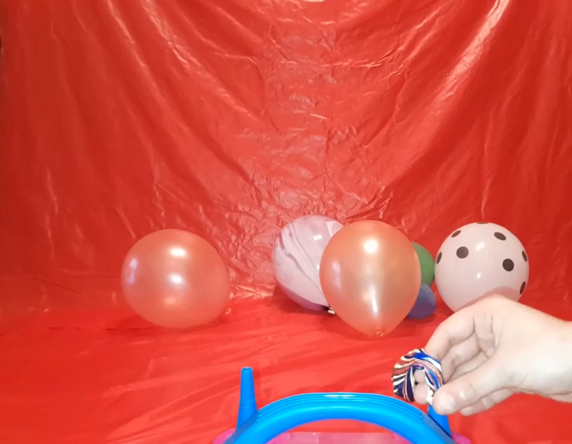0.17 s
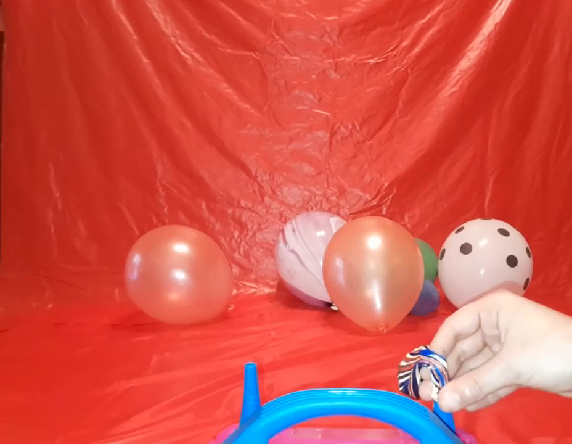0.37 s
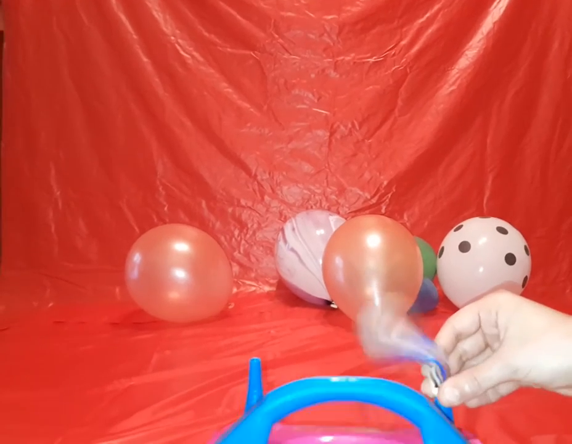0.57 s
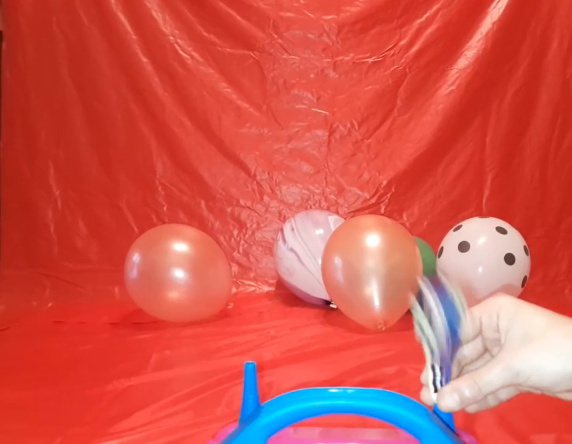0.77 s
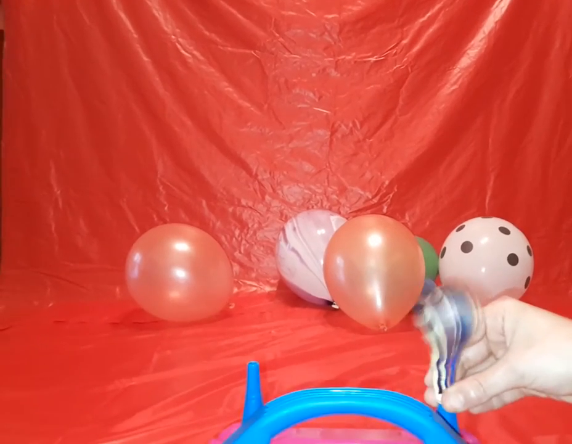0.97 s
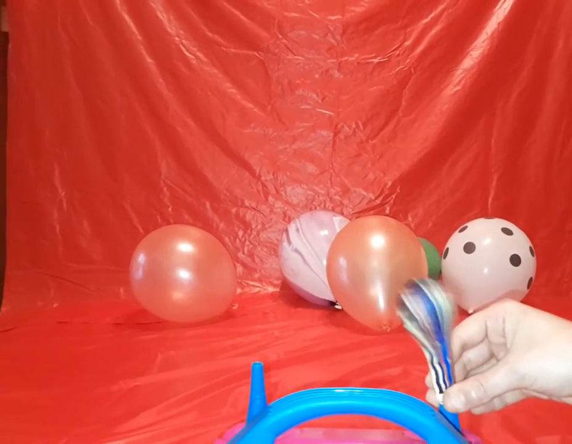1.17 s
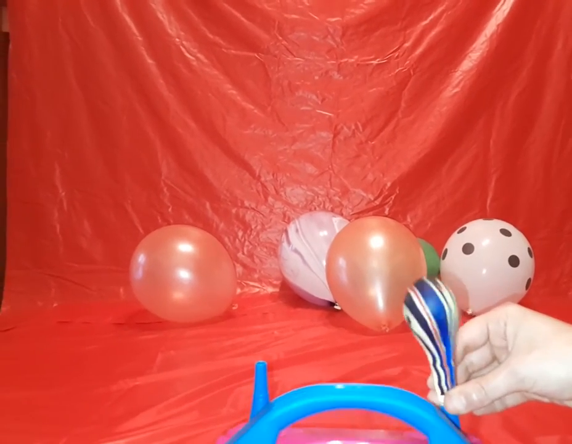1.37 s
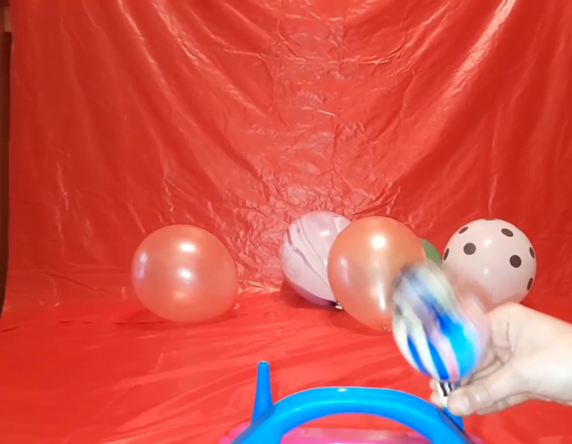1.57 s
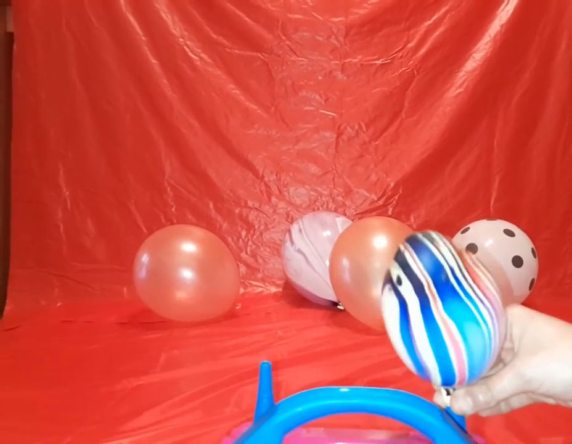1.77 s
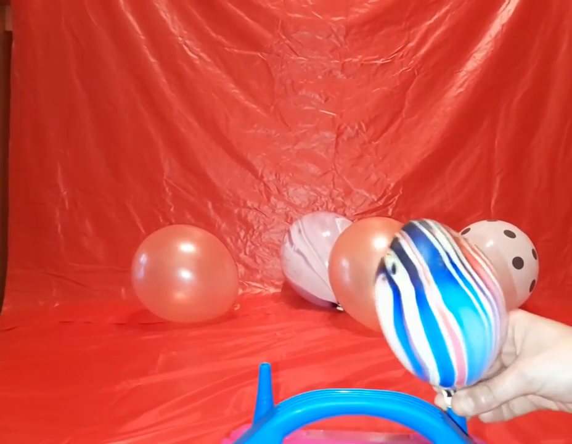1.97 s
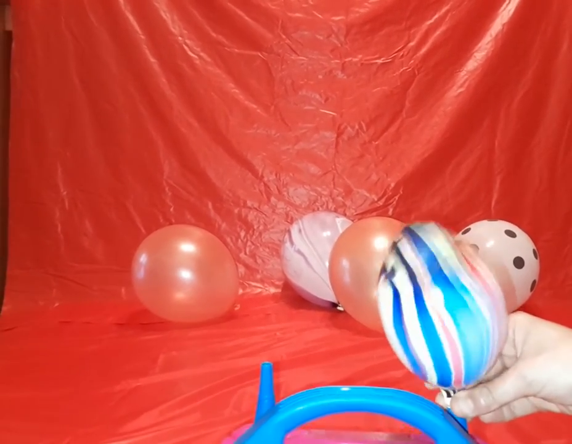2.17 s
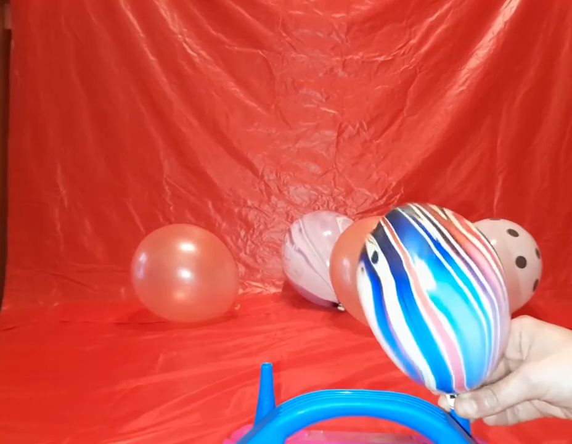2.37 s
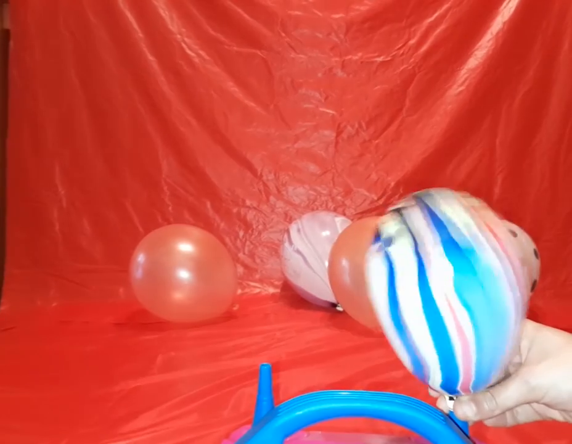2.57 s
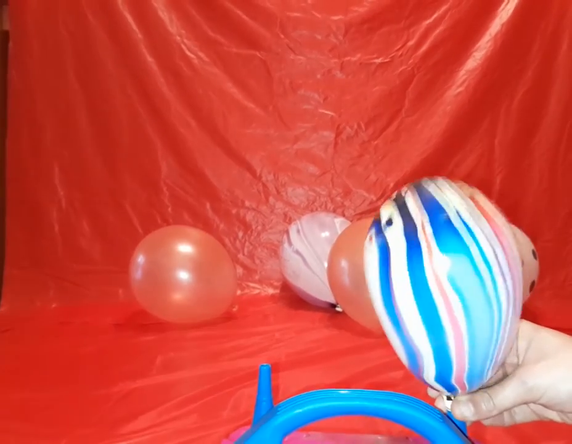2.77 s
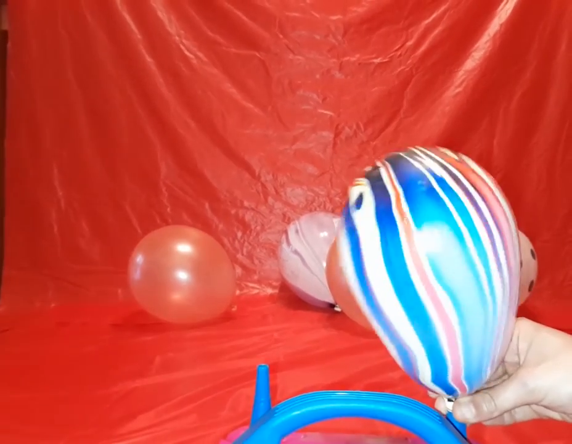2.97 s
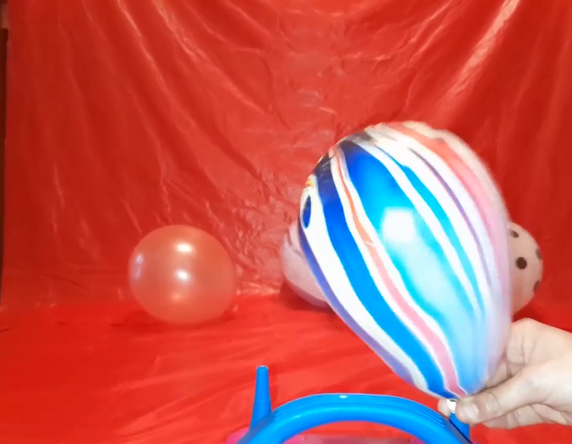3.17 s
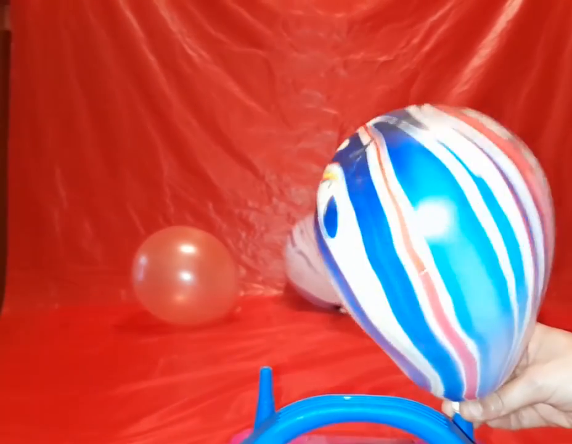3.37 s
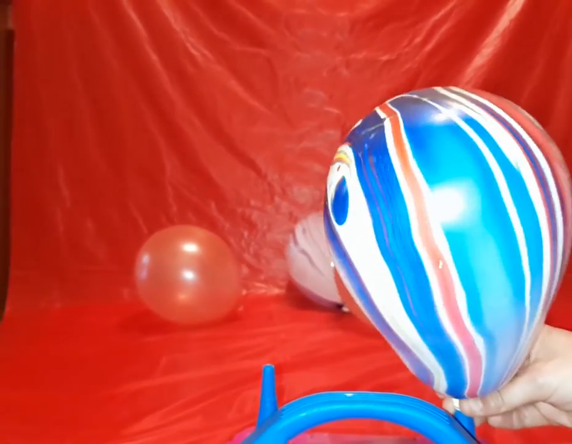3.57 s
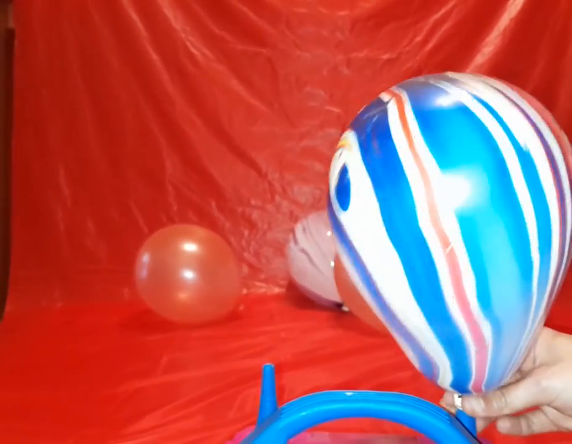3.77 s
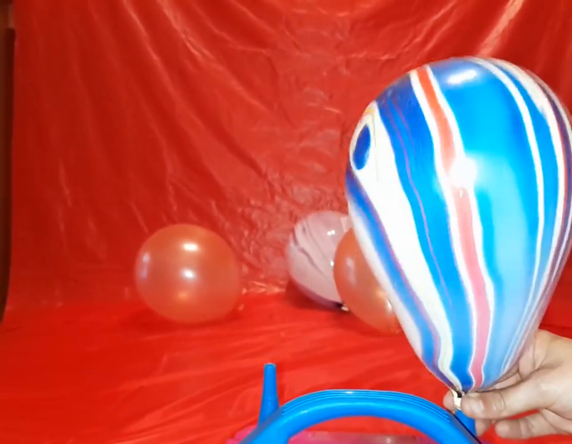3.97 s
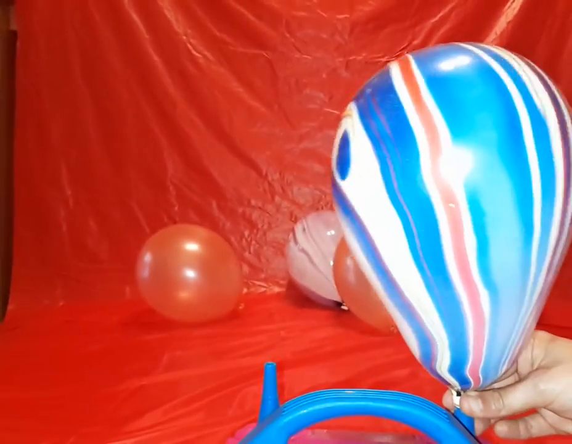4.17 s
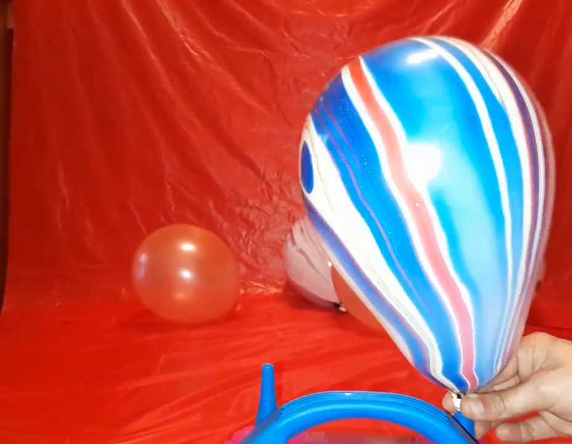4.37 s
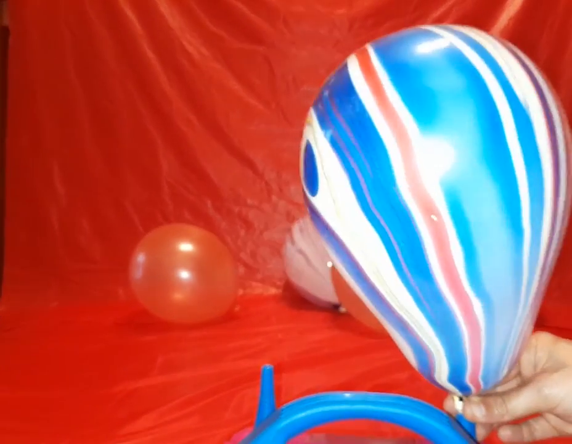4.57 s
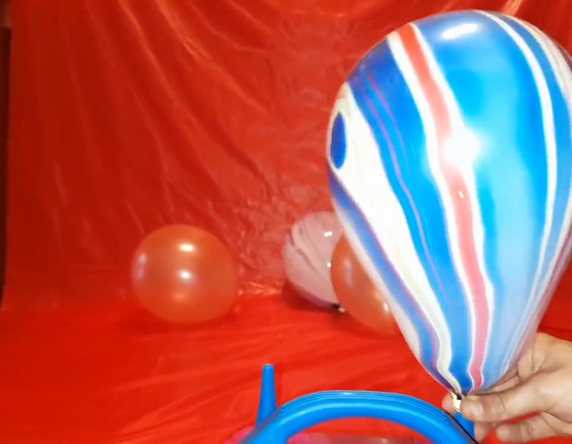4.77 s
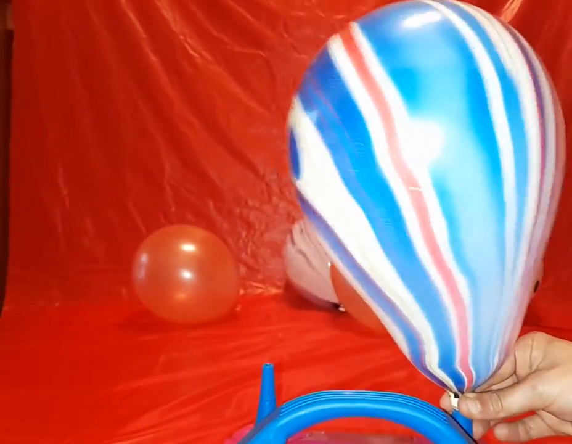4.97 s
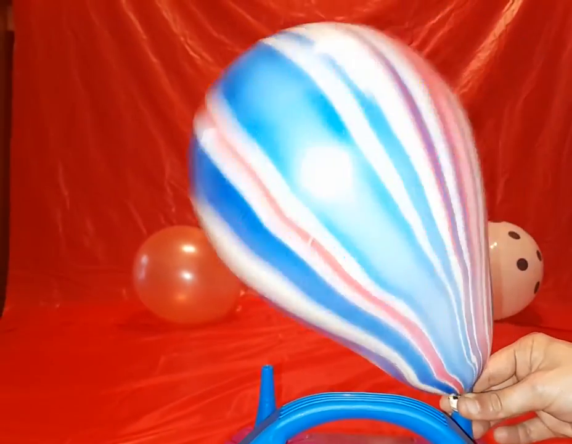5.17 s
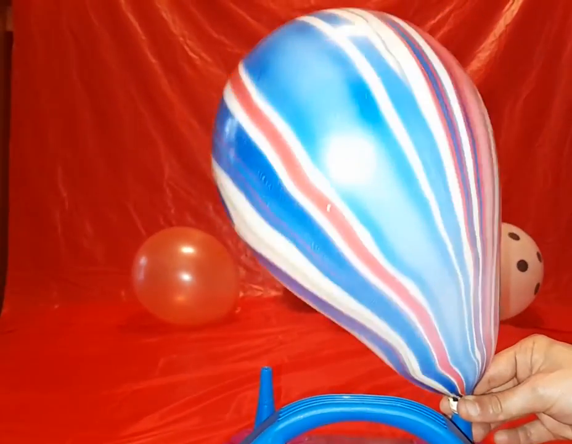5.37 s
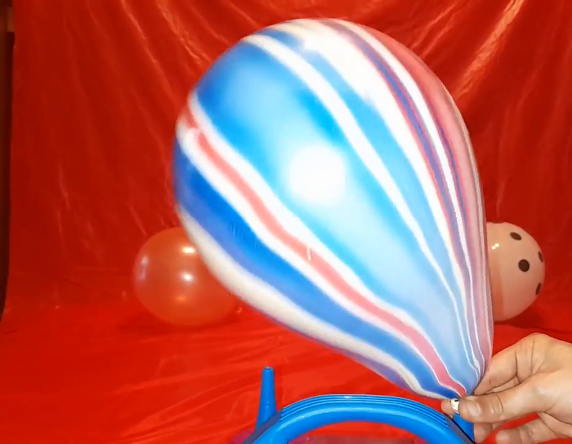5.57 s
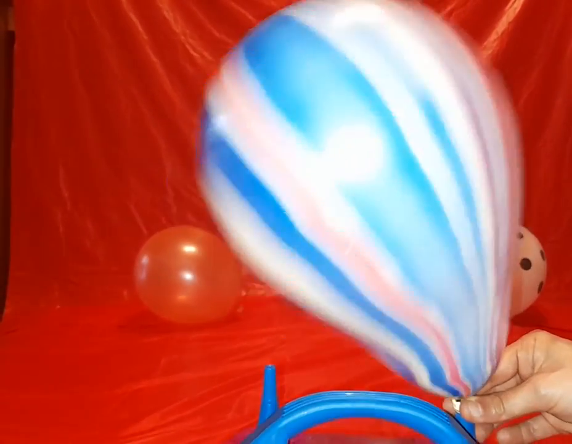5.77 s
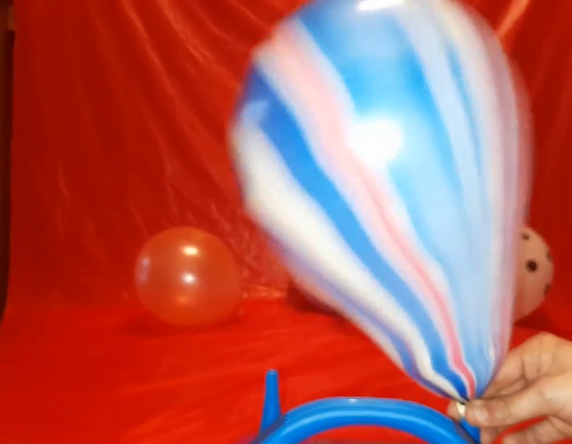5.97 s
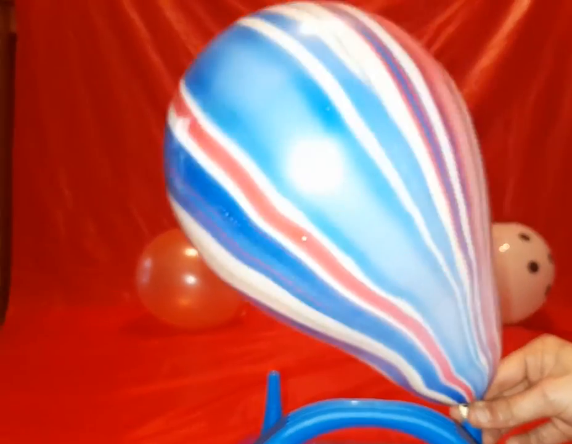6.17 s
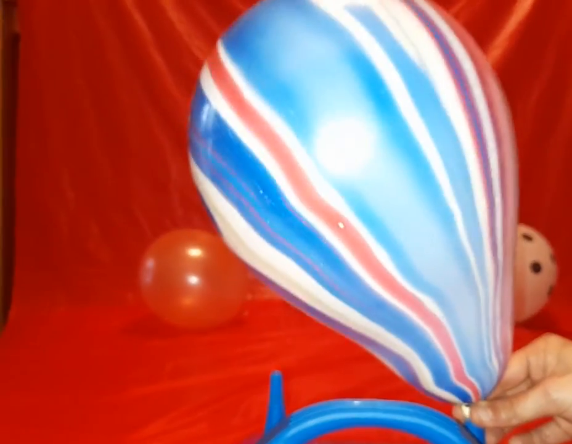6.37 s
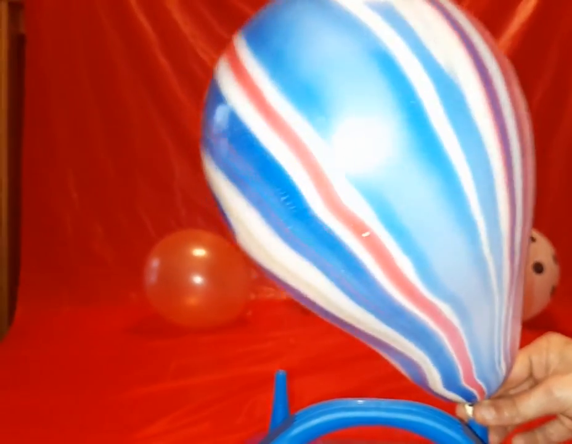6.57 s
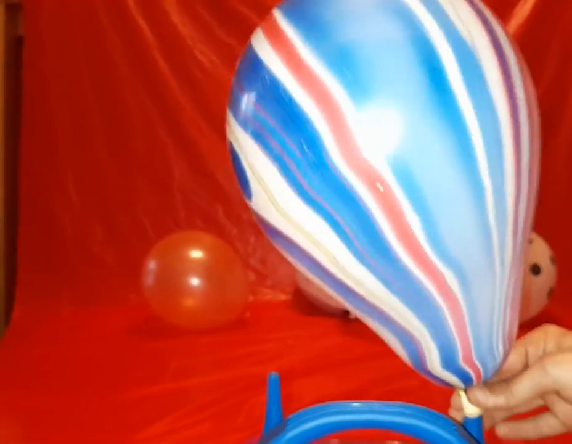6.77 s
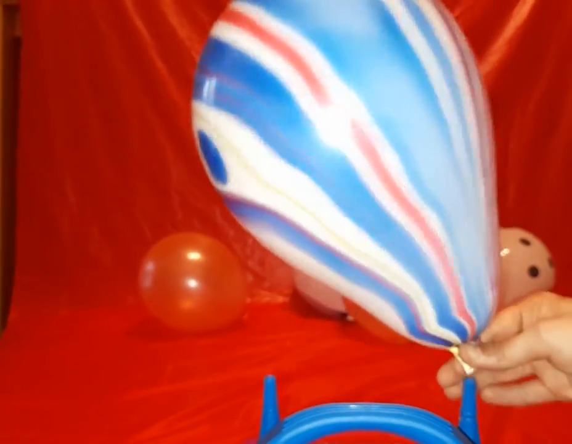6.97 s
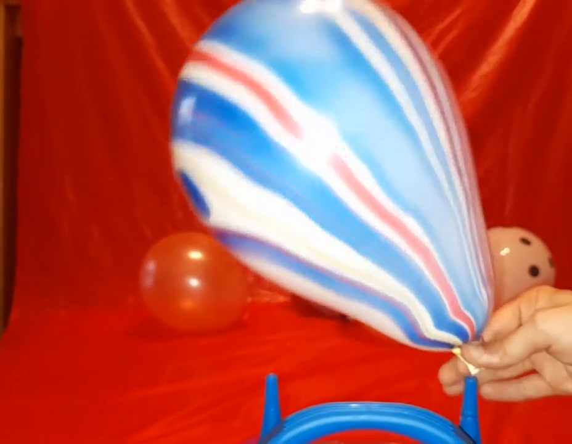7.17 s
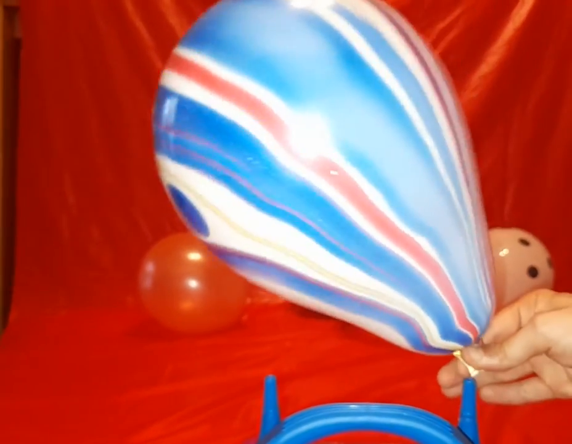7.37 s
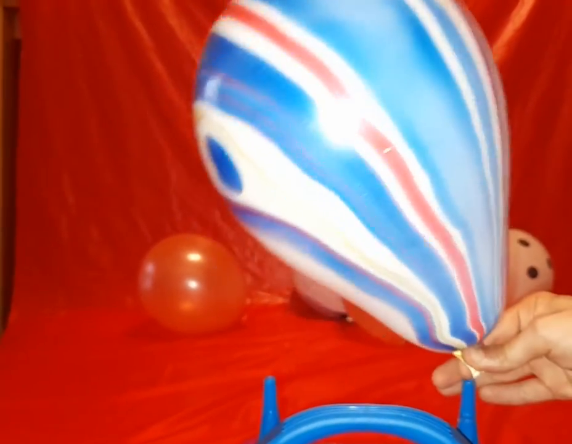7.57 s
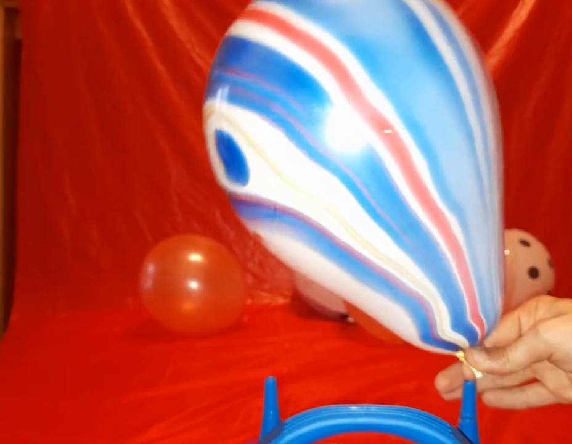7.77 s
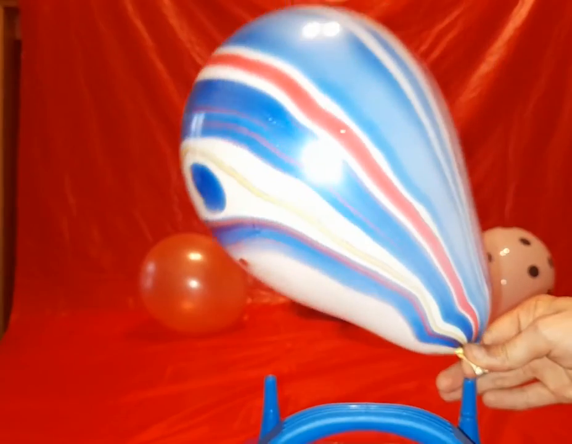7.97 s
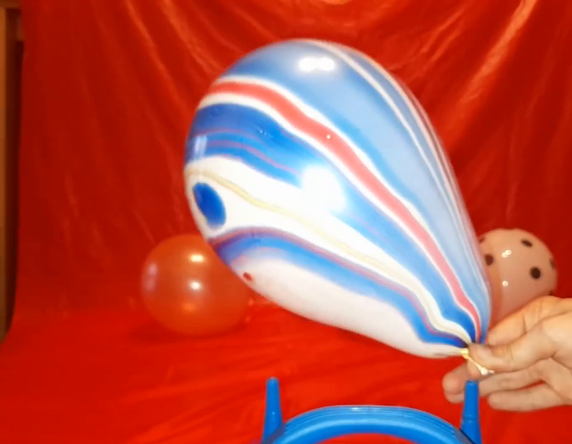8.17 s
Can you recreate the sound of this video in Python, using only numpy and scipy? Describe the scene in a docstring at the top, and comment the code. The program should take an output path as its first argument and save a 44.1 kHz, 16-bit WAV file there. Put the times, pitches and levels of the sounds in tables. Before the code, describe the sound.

A small electric balloon pump revs in seven short bursts, whining and hissing, then a rubber balloon neck snaps off the nozzle.

```python
"""Close beside a small electric balloon pump, pulsed on and off: its fan motor revs, coasts, winds down.
The unbalanced shaft hums, the blades whistle, and turbulent air roars and hisses through the plastic case.
Near the end the rubber neck snaps off the nozzle. The pump's level in the right channel jumps up at
about 1.6 s; the left microphone port is muffled and mostly takes low buffeting."""
import sys
import numpy as np
from scipy import signal
from scipy.fft import rfft, irfft, next_fast_len
from scipy.io import wavfile
from scipy.ndimage import uniform_filter1d, map_coordinates

SR = 44100
rng = np.random.default_rng(int(sys.argv[2]) if len(sys.argv) > 2 else 0)


def persist_wave(psi):
    """Save psi, clipped to +-1, as 16-bit WAV."""
    counts = np.round(np.clip(psi, -1, 1) * 32767).astype(np.int16)
    wavfile.write(sys.argv[1], SR, np.atleast_2d(counts).T)


N = 361605

# button held: pressed t/s, released t/s
BUTTON = [(0.5, 0.5957), (1.3844, 1.5318), (2.1575, 2.2546), (2.7294, 3.0953), (3.8607, 4.0219),
          (4.6045, 4.9753), (5.749, 5.9018)]
# imbalance tone as the case passes it: shaft f/Hz, level/dB
SHAFT_TONE = [(20, -100), (150, -51.5), (200, -62.5), (260, -51.5), (335, -36.5), (370, -37), (400, -40),
              (440, -30), (470, -30.5), (510, -26), (535, -32.5), (570, -33.5), (600, -28.5)]
# blade tone against the hiss: f/Hz, level/dB
BLADE_TONE = [(1000, -39), (1450, -9.5), (1560, -12), (1650, -24), (2500, -29), (2620, -14.5),
              (2950, -19.5), (3100, -23), (3680, -29), (3780, -10), (4000, -13), (4200, -11)]
# whine against the hiss: shaft multiple, level/dB, resonance f/Hz, width/Hz
# commutator bars give the twelves, blades 14 and 21, bearings the rest
WHINE_PARTIALS = [(4.38, -5, 900, 50), (12, -19, 2150, 200), (12.6, -12, 1990, 130), (14, -16, 2700, 120),
                  (21, -16, 12300, 600), (24, -14, 4500, 1500), (36, -16, 5600, 600),
                  (43.4, -24, 9800, 900), (48, -20, 7700, 1100), (55.2, -22, 10200, 700),
                  (66.8, -19, 10600, 500), (72, -17, 10400, 700)]
# colours of the roar and the hiss: f/Hz, level/dB
ROAR_COLOUR = [(150, -35), (230, -21), (350, -5), (520, -11.5), (650, -5.5), (760, -2), (900, -6.5),
               (1200, -10.5), (1700, -16), (2200, -18), (2800, -19.5), (3600, -14), (4800, -24)]
HISS_COLOUR = [(1200, -25), (2000, -13), (3300, -8.5), (3750, -5), (4400, -7), (5600, -0.5), (6600, 1),
               (7300, -3), (8100, -14), (10500, -7.5), (11200, -5), (13000, -4.5), (15300, -9), (16000, -9)]
# rings of the hollow case and the plastic shell: f/Hz, width/Hz, level/dB
CASE_MODES = [(609, 35, -6.5), (706, 24, -2.5), (754.4, 28, -2.5), (878, 39, 2), (1155, 150, -4.5),
              (1427, 14.5, 6.5), (1824, 21, 8), (2150, 130, 3.5), (2680, 17, 7.5)]
SHELL_MODES = [(3680, 120, -3.5), (5700, 104, -0.5), (6680, 76, -10), (7290, 140, -0.5), (8800, 200, -2),
               (10900, 180, -16), (11870, 270, -16)]
# top air leaking at the neck until the balloon is pinched: t/s, level/dB
NECK_LEAK = [(0.5, 2.5), (1.5, 0.5), (6.0, 0.5), (6.8, 1.5), (7.0, 1), (7.43, 1.5), (7.5, -4), (8.2, -7)]
# the pump's gain on the right steps up, then drifts: t/s, low level/dB, high level/dB
RIGHT_PUMP_GAIN = [(0.5, -18, -26.5), (1.3, -20, -26.5), (1.566, -14, -23), (1.586, 0, -0.5), (1.7, 3, 2),
                   (2.4, 2, 1.5), (3.0, 0.5, -0.5), (3.8, -1.5, -2.5), (4.05, 0, -1), (4.55, -1.5, -2),
                   (5.1, 0.5, 0), (6.0, -.5, -1), (6.85, 0.5, -1), (7.03, 1, 2), (7.25, -2.5, .5),
                   (7.6, 0, 0), (8.2, -1.5, 2)]
# motor chirps: t/s, level/dB, start f/Hz, end f/Hz, length/s
CHIRPS = [(0.568, -47.5, 3550, 4000, .04), (1.38, -51, 3570, 3800, .035)]
# slips of the neck: t/s, crack level/dB, ring level/dB
NECK_SLIPS = [(6.936, -24, -30), (6.9445, -10, -18), (6.9462, -9, -20), (6.9487, -9, -17),
              (6.9507, -8, -15), (6.9555, -20, -24)]
# rings of the rubber: f/Hz, level/dB, t60/s
NECK_MODES = [(342, -3, 0.12), (850, -4.5, 0.033), (1245, -8.5, 0.036), (9550, -13, 0.046)]
# air noise in the covered port: f/Hz, level/dB
COVERED_COLOUR = [(250, -1), (400, -5), (600, -5), (800, -3), (1100, -8), (1500, -18), (2000, -18),
                  (2800, -15), (4000, -21), (5500, -22.5), (7500, -28), (10000, -28), (12500, -17),
                  (14000, -16)]
# wind on the ports: t/s, left level/dB, right level/dB added to RIGHT_WIND_LAW
WIND_RIDE = [(0.49, -90, -20), (0.52, -59, -20), (0.6, -47, -16), (0.9, -69, 4), (1.34, -73, -8),
             (1.38, -50, 1), (1.45, -47, -24), (1.6, -47.5, 0), (4.6, -50, 0.5), (6.4, -50.5, -2),
             (6.55, -39, 7), (6.65, -49.5, 0), (7.5, -48.5, -6), (7.8, -50.5, 20), (8.2, -50.5, 15)]
# wind colours, left then right: f/Hz, level/dB
WIND_COLOURS = [
    [(15, -30), (22, -17), (35, -6), (55, -3), (80, -3), (110, -12.5), (150, -16), (200, -30), (300, -34)],
    [(15, -25), (35, -8), (55, -4), (80, -2), (110, -13), (150, -5.5), (200, -6.5), (300, -1)],
]
# gusts thumping a port: t/s, level/dB, f/Hz, port (0 left, 1 right)
GUSTS = [(2.92, -33, 50, 1), (3.998, -28, 60, 1), (4.70, -34, 70, 1), (4.815, -21, 129, 1),
         (4.955, -33, 50, 1), (4.99, -23, 60, 1), (5.145, -24, 55.4, 1), (5.93, -40, 50, 1),
         (6.521, -25, 70, 0), (6.956, -36, 70, 1)]
# noise floor colours, left then right: f/Hz, level/dB
FLOOR_COLOURS = [
    [(20, -19.0), (60, -11.1), (120, -6.4), (250, 1), (500, 4), (1000, -2), (2000, -6), (4000, -15),
     (8000, -11), (14000, -7)],
    [(20, -14.5), (60, -2), (120, 4), (250, -17), (500, -8), (1000, -16.5), (2000, -17), (4000, -23.0),
     (8000, -21.7), (14000, -18)],
]

REF_HZ = 500  # reference shaft speed
# level laws: level/dB at REF_HZ, exponent of speed, extra level/dB under power
ROAR_LAW, HISS_LAW = (-26, 1.273, -0.44), (-19, 2.17, 0.87)
BODY_LAW, TREBLE_LAW = (-60.5, 1.6, .7), (-64.5, 1.9, .4)  # covered port
RIGHT_WIND_LAW = (-60.5, 0.8, 11.4)  # the draught arrives mostly under power


def pump(speed, power):
    """The fan's tones and turbulent air, all following the motor: returns (hum, roar, full mix)."""
    low_db, high_db = curves(RIGHT_PUMP_GAIN)
    roar_db = law(ROAR_LAW, speed, power) + low_db
    hiss_db = law(HISS_LAW, speed, power) + high_db
    angle = 2 * np.pi * np.cumsum(speed * (1 + 0.00206 * wobble(40))) / SR
    hum = np.sqrt(2) * amp(along(SHAFT_TONE, speed) + low_db + 2.46 * wobble(30)) * np.sin(angle)
    tones = blade_whistle(speed, power, angle) + motor_whine(speed, angle)
    eddies = wobble(7)  # roar and hiss surge together
    roar = amp(roar_db + 0.6 * eddies + 0.27 * wobble(25))
    roar *= rush(ringing(ROAR_COLOUR, CASE_MODES), patchy_db=1)
    hiss = jet_hiss()
    flutter = 1 + 0.083 * np.sin(angle)  # the wobbling fan pulses the jet once a turn
    jet = amp(0.46 * eddies) * flutter * hiss
    tail = amp(-66 - 60 * np.arange(N) / SR / 0.39) * hiss  # a faint hiss dies away at the start
    return hum, roar, hum + roar + amp(hiss_db) * (tones + jet) + tail


def motor(steps_per_s=1000, release_s=.04):
    """The motor pulls against friction and fan drag: returns (shaft speed in Hz, power 0-1)."""
    t = np.arange(N * steps_per_s // SR + 2) / steps_per_s
    power = sum(np.clip((t - on) * steps_per_s, 0, 1) - np.clip((t - off) / release_s + .5, 0, 1)
                for on, off in BUTTON)
    friction, ref_drag, ref_pull, max_pull = 71.9, 302.7, 1140, 3806  # Hz per s
    speed = [0]
    for throttle in power[1:]:
        ratio = (speed[-1] + .5) / REF_HZ
        pull = throttle * min(max_pull, ref_pull / ratio ** 2.107)
        drag = ref_drag * ratio ** 2.465
        speed.append(max(speed[-1] + (pull - friction - drag) / steps_per_s, 0))
    return [np.interp(np.arange(N) / SR, t, c) for c in (speed, uniform_filter1d(power, size=30))]


def blade_whistle(speed, power, angle, blades=7):
    """Passing blades chop the air into a tone; low down it wavers more and drowns under power."""
    hz = blades * speed
    high = hz > 3400
    level_db = along(BLADE_TONE, hz) + np.where(high, 2, 3.5) * wobble(45)
    phase = blades * angle + np.where(high, .3, .9) * wobble(70)
    return np.sqrt(2) * np.where(high, 1, 1 - power) * amp(level_db) * np.sin(phase)


def motor_whine(speed, angle):
    """Faint partials, each swelling as it sweeps through a resonance."""
    out = np.zeros(N)
    for multiple, db, centre, width in WHINE_PARTIALS:
        resonance = np.exp(-((multiple * speed - centre) / width) ** 4)
        out += amp(db + 3.5 * wobble(40)) * resonance * np.sin(multiple * angle + .9 * wobble(60))
    return np.sqrt(2) * out


def jet_hiss():
    """Rushing air rings the shell; the leak at the neck rides the top end."""
    hiss = rush(ringing(HISS_COLOUR, SHELL_MODES), patchy_db=1.2)
    top = filtered(hiss, lambda hz: 1 / (1 + (8500 / (hz + 1)) ** 12))
    return hiss + top * (amp(curves(NECK_LEAK)[0]) - 1)


def neck_snap(crack_t60=.004, puff_rise_s=0.16, puff_t60=0.25):
    """Each slip cracks the escaping jet and rings the rubber; a longer puff of air surrounds them."""
    rings, cracks = np.zeros((2, N))
    t = np.arange(SR // 10) / SR
    for s, crack_db, ring_db in NECK_SLIPS:
        start = round(s * SR)
        for hz, db, t60 in NECK_MODES:
            decay = amp(db + ring_db + rng.normal(0, 3.2) - 60 * t / t60)
            rings[start:][:len(t)] += decay * np.sin(2 * np.pi * hz * t)
        cracks[start:][:len(t)] += amp(crack_db - 60 * t / crack_t60)
    age = np.arange(N) / SR - NECK_SLIPS[-2][0]
    puff = amp(-20 - 60 * np.abs(age) / np.where(age < 0, puff_rise_s, puff_t60))

    def colour(hz):
        return amp(along(HISS_COLOUR, hz)) / (1 + (hz / 11500) ** 4) / (1 + (3500 / (hz + 1)) ** 4)
    return rings + (puff + cracks) * rush(colour, patchy_db=1)


def squeaks():
    """Rough little rising whistles as the motor pulls up from slow."""
    out = np.zeros(N)
    for s, db, start_hz, end_hz, length in CHIRPS:
        size = round(length * SR)
        hz = np.linspace(start_hz, end_hz, size) * (1 + .02 * wobble(300)[:size])
        out[round(s * SR):][:size] += amp(db) * np.hanning(size) * np.sin(2 * np.pi * np.cumsum(hz) / SR)
    return out


def covered_port(hum, roar, drive):
    """The pump on the left: a dull, weak, slightly late hum and roar among unrelated air noise."""
    body = filtered(hum + 0.58 * roar, lambda hz: 1 / (1 + (hz / 1400) ** 4))
    envelope = np.sqrt(np.abs(uniform_filter1d(body ** 2, size=SR // 10))) + 1e-9
    bleed = np.pad(body / envelope, (4, 0))[:N]
    low = .7 * bleed + .7 * rush(band(COVERED_COLOUR, 150, 1800), patchy_db=1.5)
    treble = rush(band(COVERED_COLOUR, 1800, 18600), patchy_db=-1.5)
    return amp(law(BODY_LAW, *drive)) * low + amp(law(TREBLE_LAW, *drive)) * treble


def buffeting(drive):
    """Lumpy low wind on each port, with single gusts thumping through."""
    left_db, right_db = curves(WIND_RIDE)
    right_db += law(RIGHT_WIND_LAW, *drive)
    rumble = [unit(amp(3.4 * wobble(15)) * rush(band(colour, 12, 400), patchy_db=2))
              for colour in WIND_COLOURS]
    out = amp([left_db, right_db]) * rumble
    t = np.arange(SR // 10) / SR
    for s, db, hz, port in GUSTS:
        thump = amp(db) * np.exp(-1.6 * hz * t) * np.sin(2 * np.pi * hz * t)
        out[round(port), round(s * SR):][:len(t)] += thump
    return out


def noise_floor():
    """A steady, quiet bed under each port."""
    beds = [rush(band(colour, 12, 12000), patchy_db=-2) for colour in FLOOR_COLOURS]
    return amp([[-78], [-79]]) * beds


def law(terms, speed, power, start_hz=200):
    """Level in dB from the motor; under power the first turns are already as loud as start_hz."""
    db, exponent, pull_db = terms
    heard_speed = np.maximum(speed, start_hz * power * np.clip(speed / 20, 0, 1))
    return db + exponent * 20 * np.log10((heard_speed + 1) / REF_HZ) + pull_db * power


def rush(colour, patchy_db):
    """Noise of rms 1 with gain colour(Hz) and patches of random level."""
    spectrum = signal.stft(rng.standard_normal(N), nperseg=512)[2]
    patches = uniform_filter1d(rng.standard_normal(spectrum.shape), size=5, axis=0)
    patches = unit(uniform_filter1d(patches, size=10, axis=1))
    noise = signal.istft(spectrum * amp(patchy_db * patches), nperseg=512)[1][:N]
    return unit(filtered(noise, colour))


def ringing(points, modes):
    """A smooth colour with resonant bumps on top."""
    return lambda hz: amp(along(points, hz)) * (
        1 + sum(amp(db) / (1 + (2 * (hz - centre) / width) ** 2) for centre, width, db in modes))


def band(points, lo_hz, hi_hz):
    """A colour cut off at two edges."""
    return lambda hz: amp(along(points, hz)) * (hz > lo_hz) * (hz < hi_hz)


def filtered(x, response):
    """EQ x with a complex response(Hz)."""
    size = next_fast_len(N + SR // 2)
    return irfft(rfft(x, size) * response(np.fft.rfftfreq(size, 1 / SR)), size)[..., :N]


def wobble(rate):
    """A smooth random curve, rate knots a second."""
    return map_coordinates(rng.standard_normal(int(N * rate / SR) + 4), [np.arange(N) * rate / SR])


def curves(rows):
    """One automation curve for each column after the time."""
    times, *columns = np.transpose(rows)
    return [np.interp(np.arange(N) / SR, times, column) for column in columns]


def along(points, hz):
    """Read (Hz, value) points on a log axis."""
    freqs, values = np.transpose(points)
    return np.interp(np.log(hz + 1), np.log(freqs + 1), values)


def amp(db):
    """dB to gain."""
    return 10 ** (np.asarray(db) / 20)


def unit(x):
    """Scale to rms 1."""
    return x / np.sqrt(np.mean(x ** 2) + 1e-20)


def scene():
    """The pump muffled on the left and clear on the right, wind and floor on both."""
    drive = motor()
    hum, roar, near = pump(*drive)
    left = covered_port(hum, roar, drive)
    right = near + neck_snap() + squeaks()
    return np.array([left, right]) + buffeting(drive) + noise_floor()


def record(dry, ceiling=.75, low_cut_hz=28, top_hz=15960):
    """Round the peaks softly, roll off the lowest rumble and cut the very top."""
    rounded = dry / (1 + np.abs(dry / ceiling) ** 4) ** .25
    return filtered(rounded, lambda hz: (hz < top_hz) * (1j * hz / (low_cut_hz + 1j * hz)) ** 2)


dry = scene()
out = record(dry)
persist_wave(out)
```